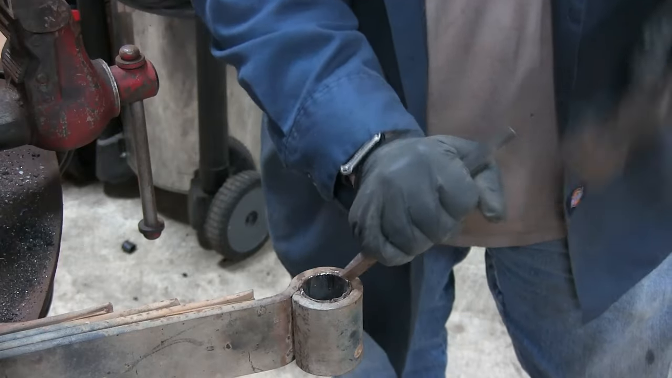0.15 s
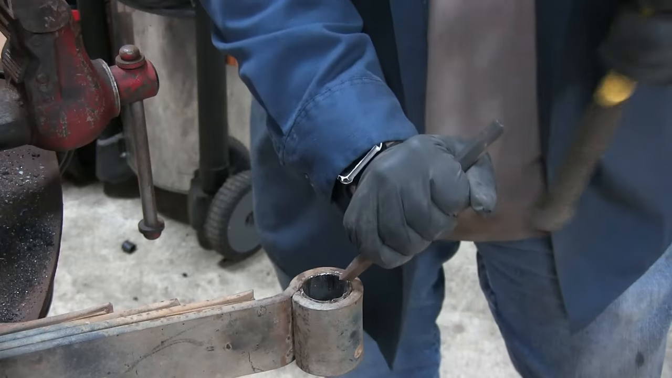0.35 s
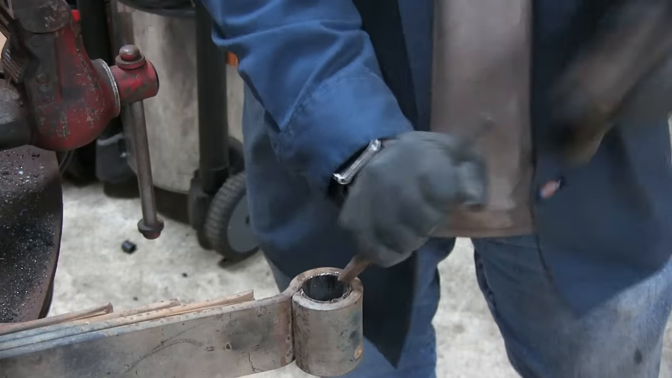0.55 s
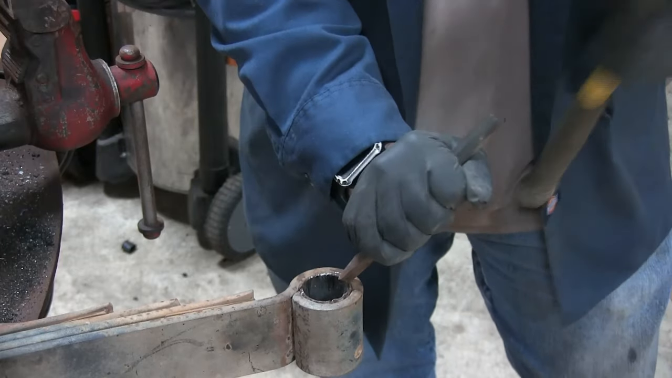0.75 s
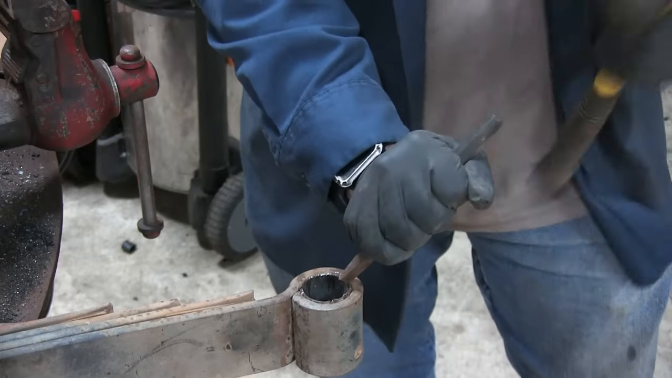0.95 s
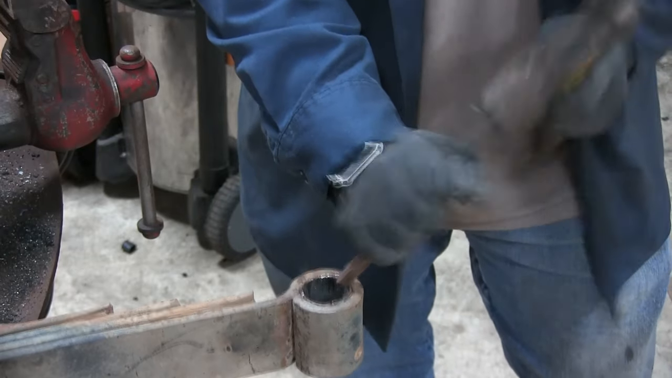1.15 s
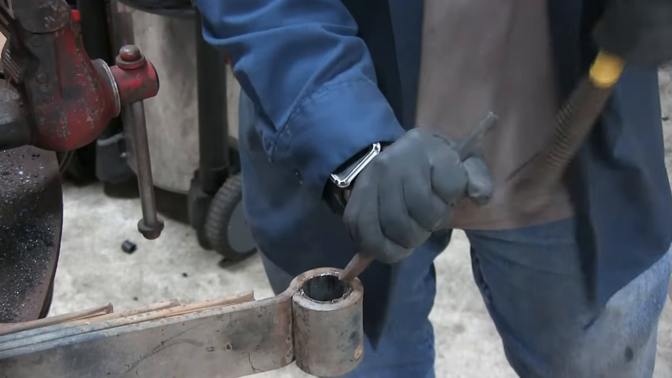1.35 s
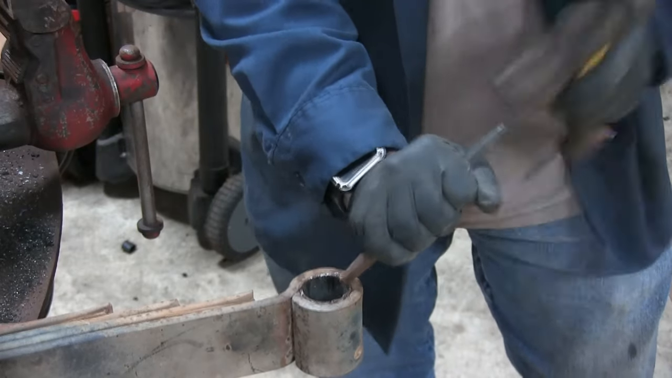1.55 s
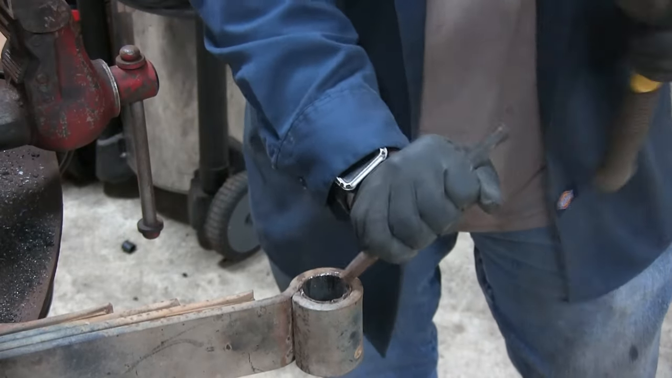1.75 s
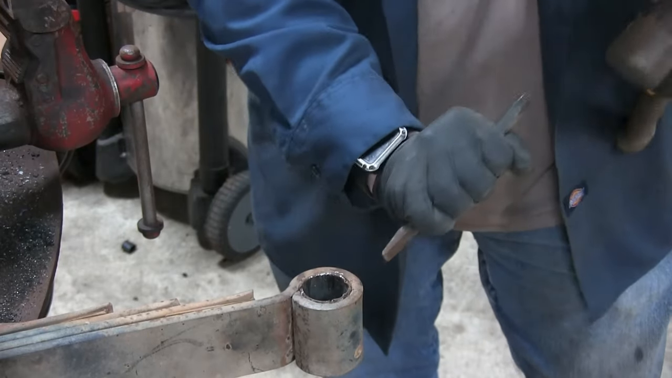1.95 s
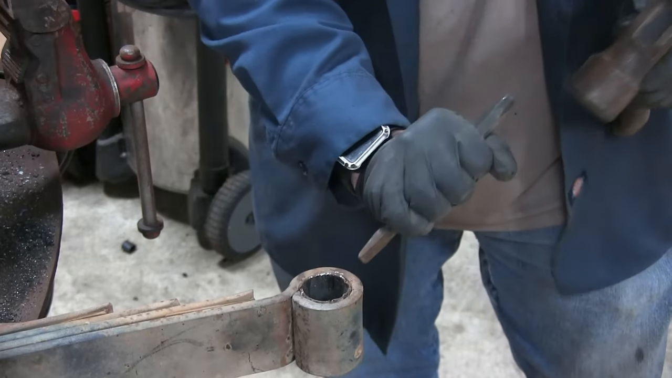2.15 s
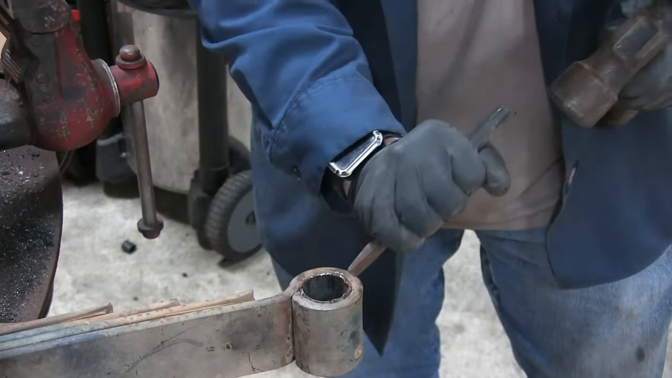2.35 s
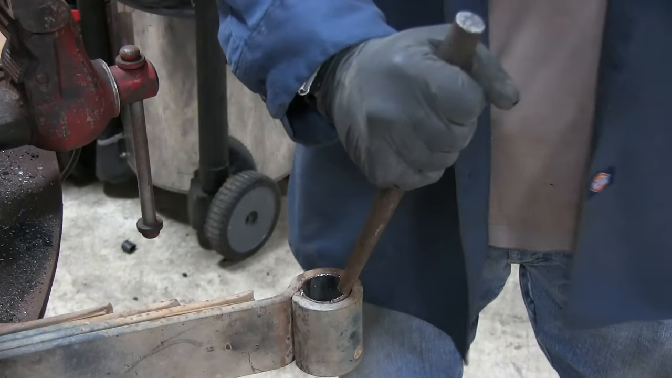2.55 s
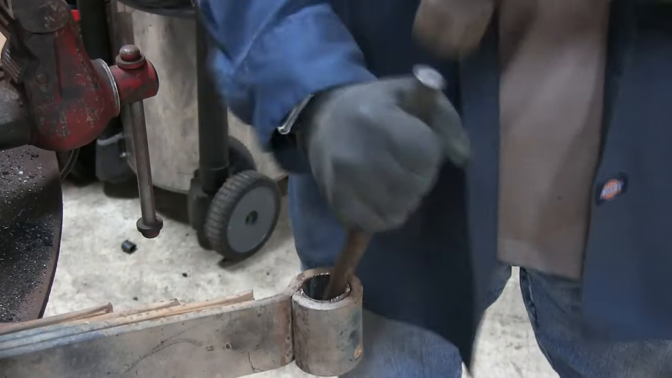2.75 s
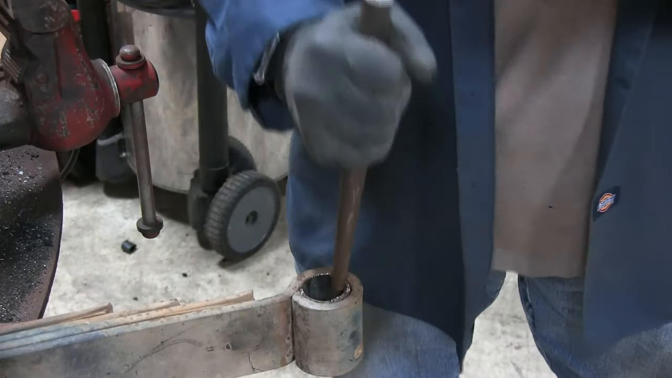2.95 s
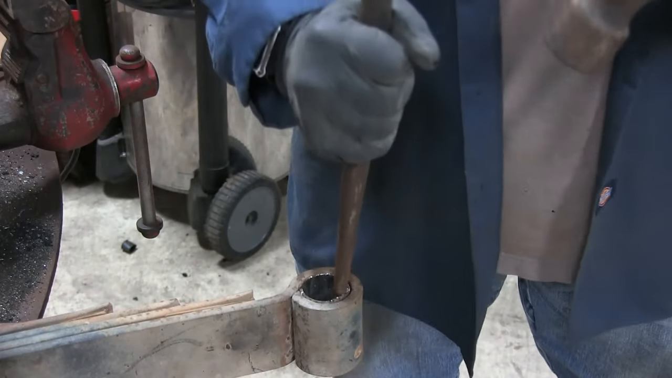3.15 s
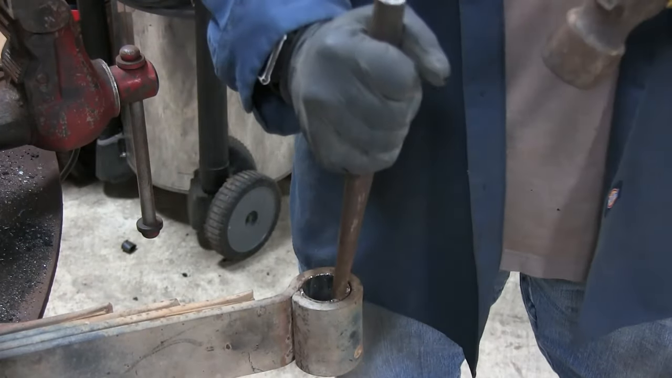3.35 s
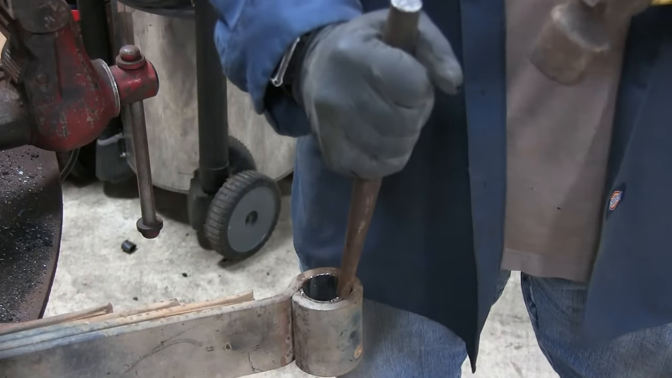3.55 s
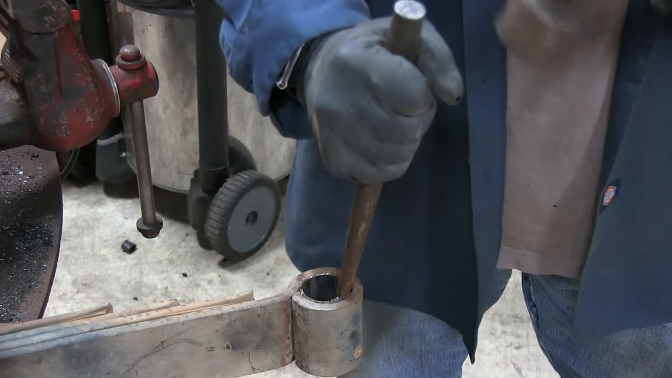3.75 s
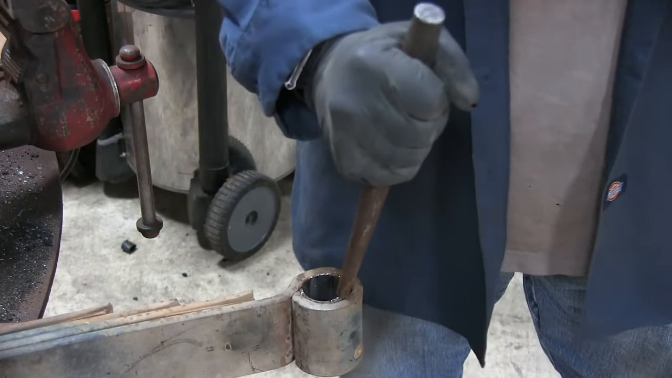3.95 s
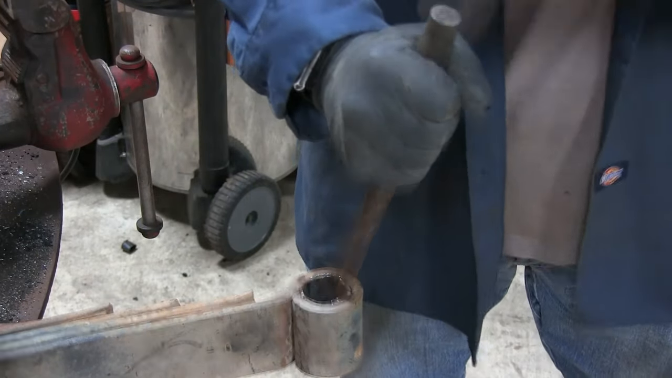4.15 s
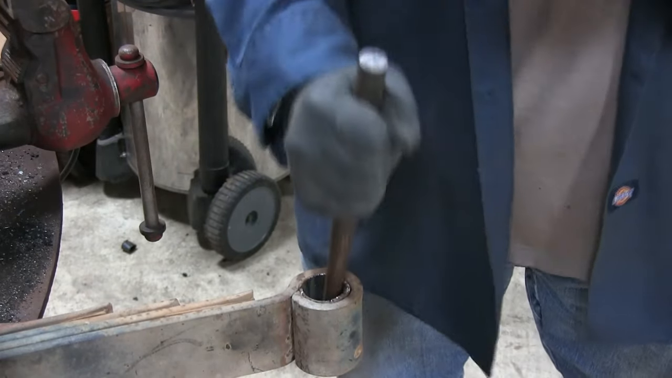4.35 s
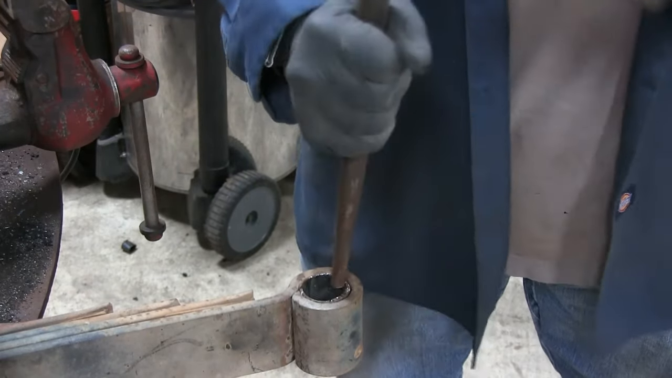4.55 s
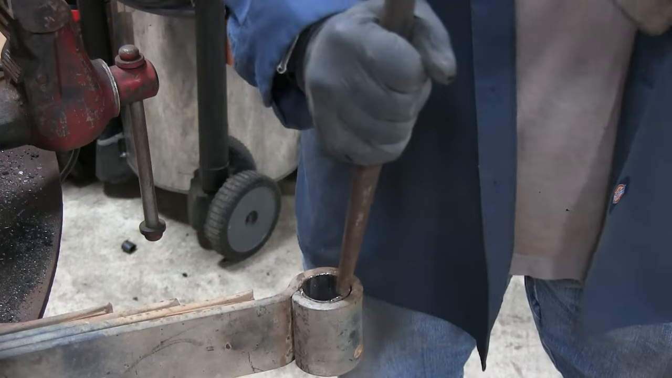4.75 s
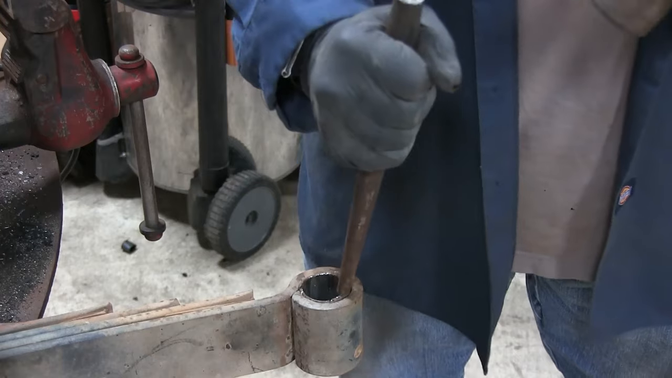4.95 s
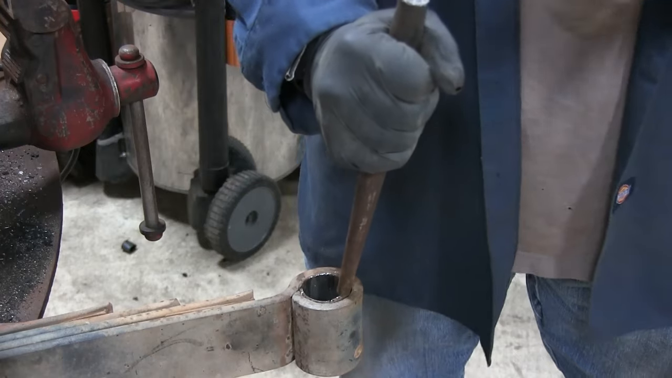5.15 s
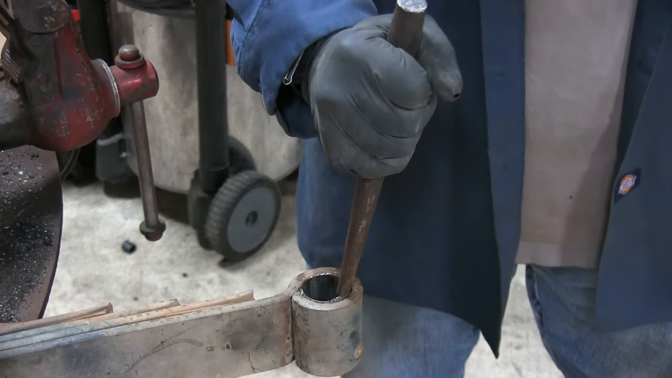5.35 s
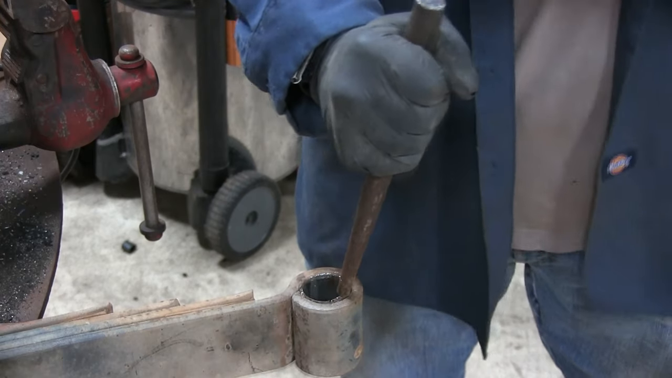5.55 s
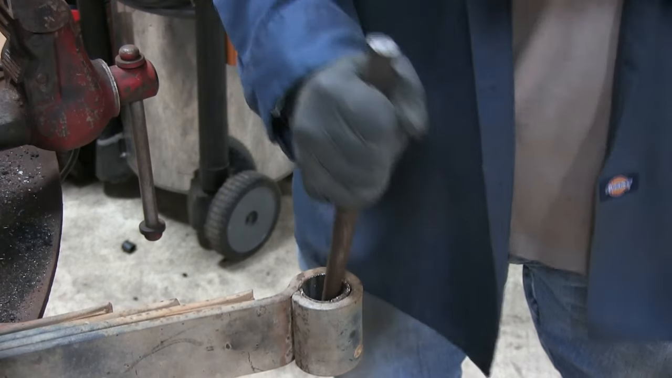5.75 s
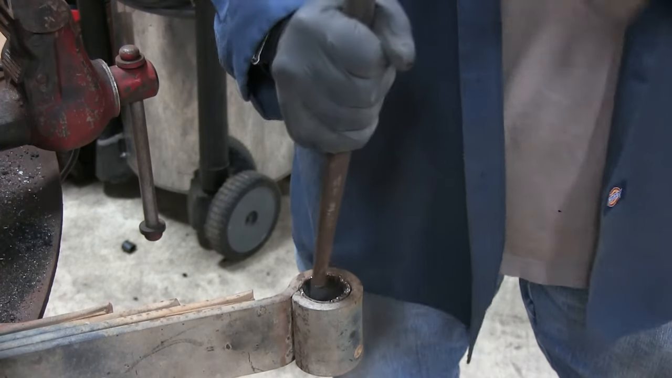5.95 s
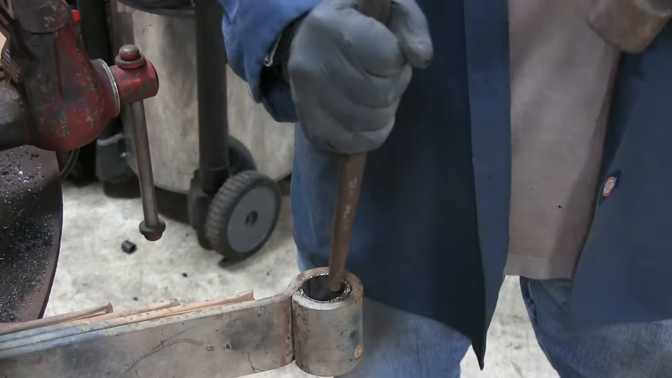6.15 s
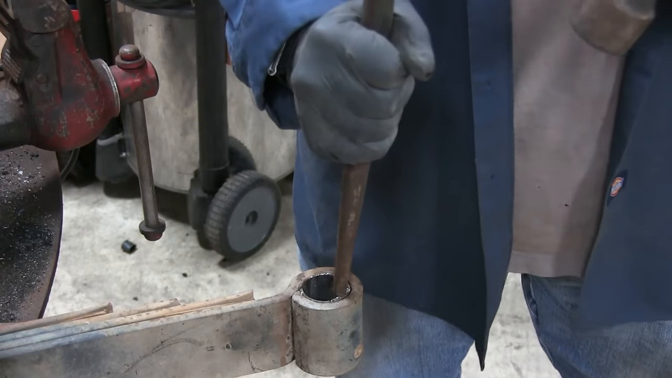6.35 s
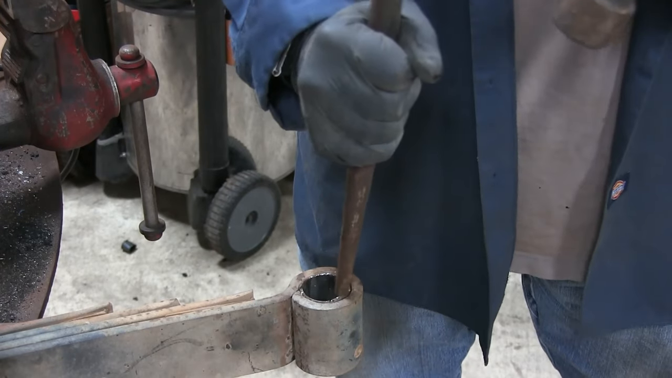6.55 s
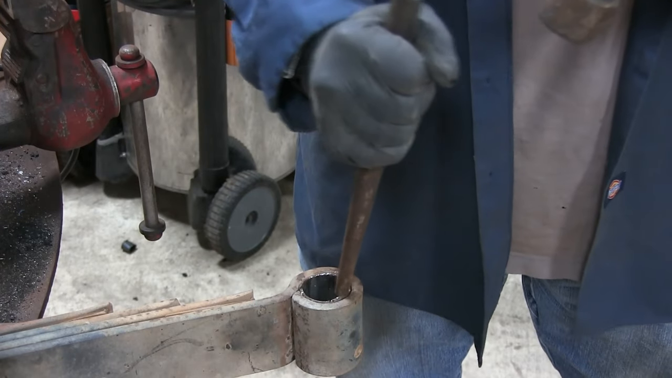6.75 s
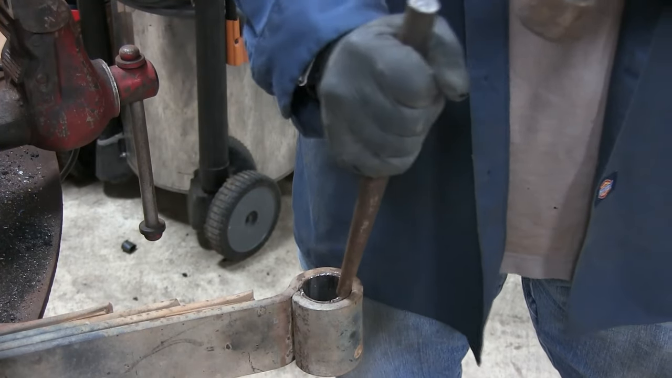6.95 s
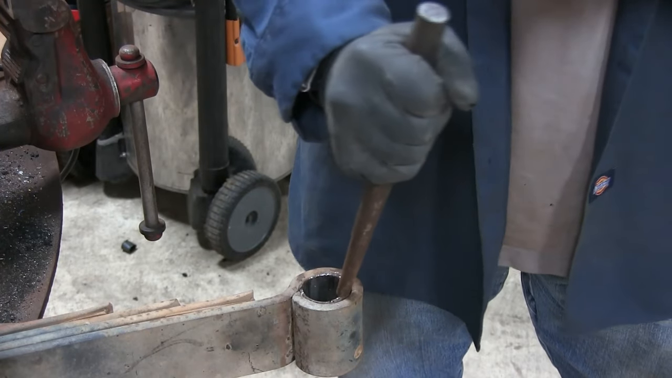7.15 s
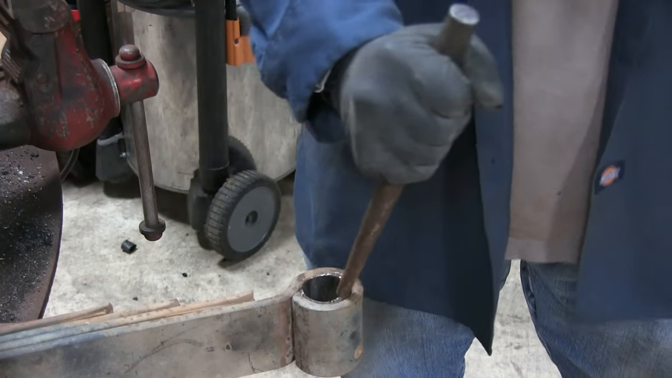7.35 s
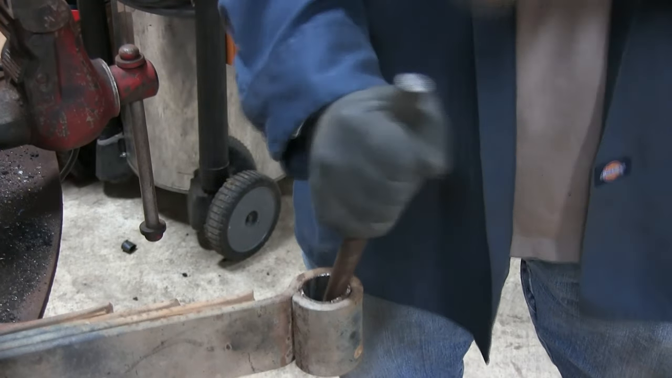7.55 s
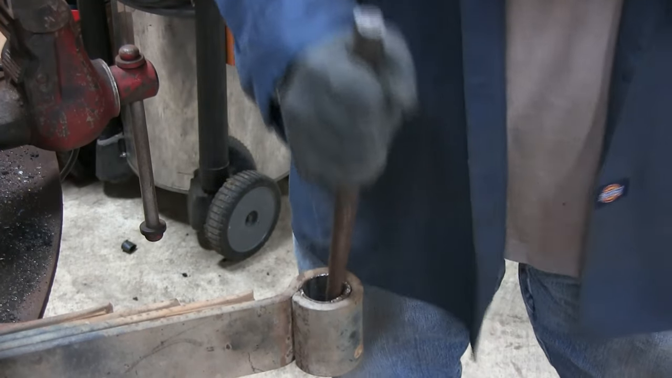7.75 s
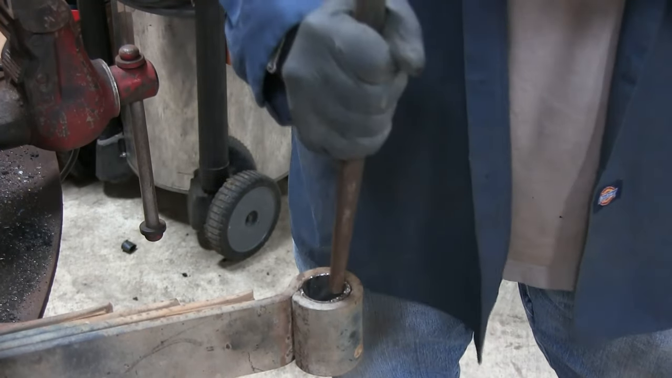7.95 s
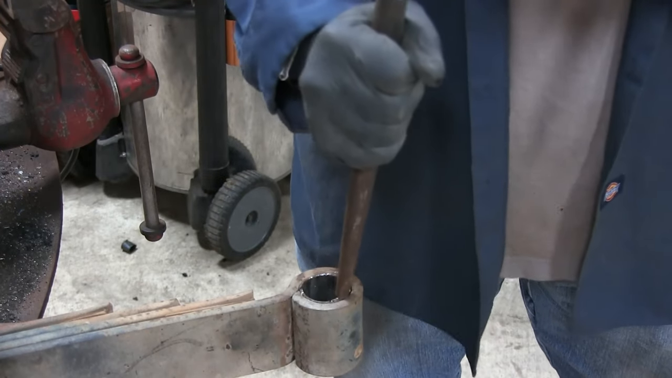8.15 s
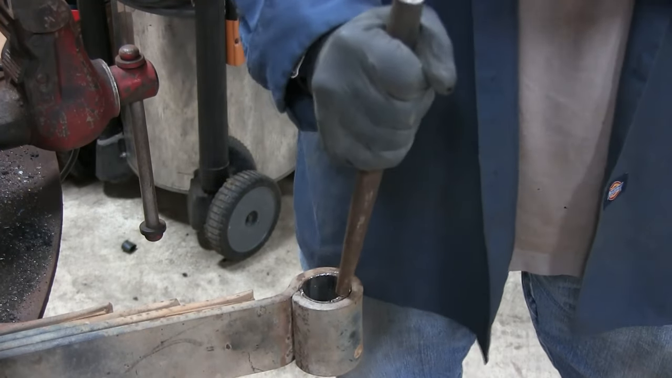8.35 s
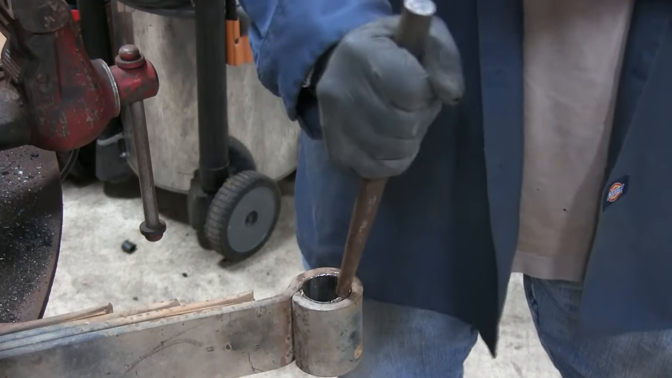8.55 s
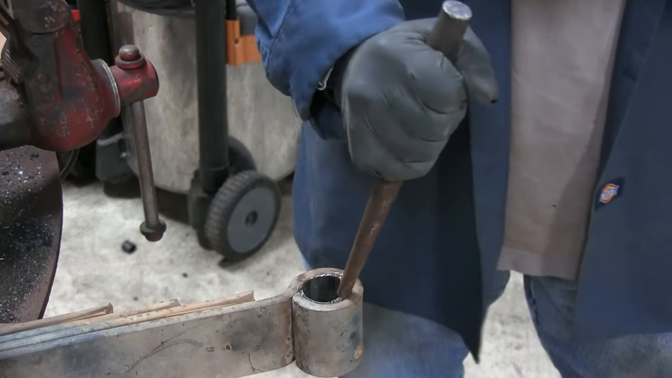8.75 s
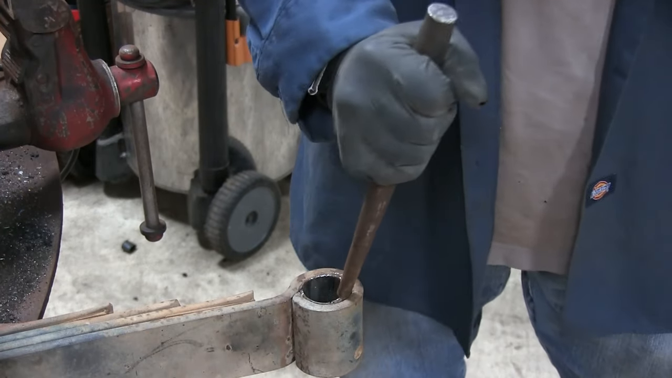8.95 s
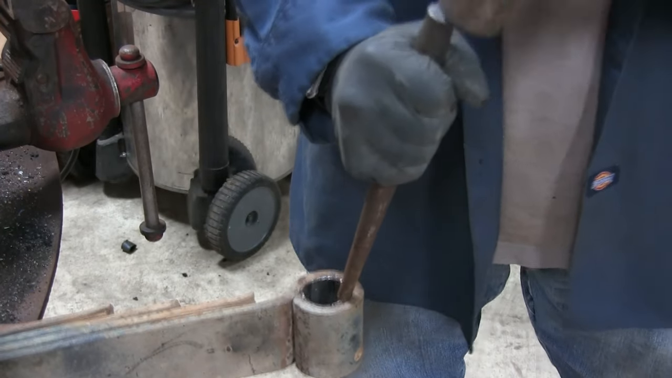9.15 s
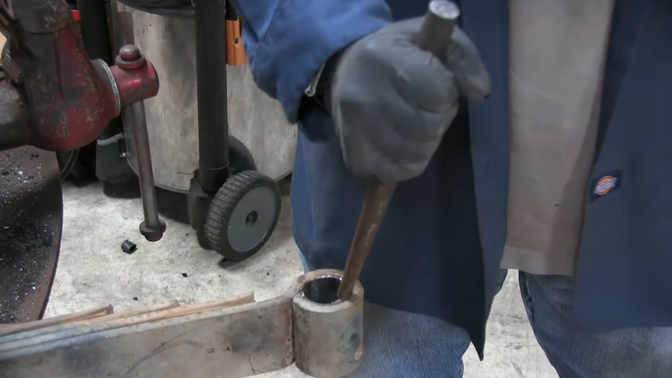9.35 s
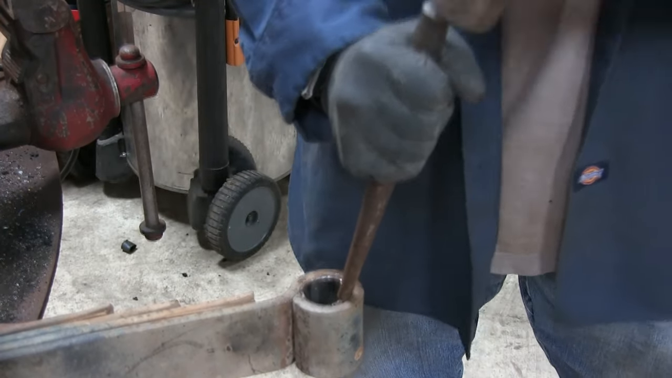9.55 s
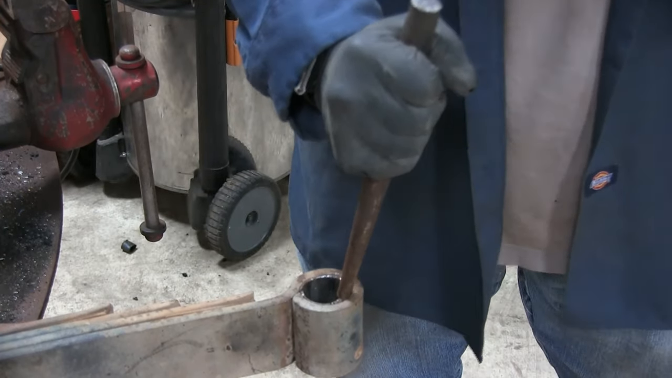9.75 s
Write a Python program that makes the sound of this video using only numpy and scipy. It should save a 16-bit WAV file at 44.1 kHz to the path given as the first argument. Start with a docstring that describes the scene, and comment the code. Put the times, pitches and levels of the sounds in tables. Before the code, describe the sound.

A hammer hits a steel punch against a metal sleeve four times in quick succession, then six more times, mostly at a slower pace. Each blow is a sharp crack with a high ring and about a second of workshop echo. After the later blows the clamped steel part rattles faintly in the vise, and the punch clinks softly on the rim. The sound is close, over very low room tone.

```python
"""A hammer drives a steel punch against a sleeve in a steel arm, held in a vise in a hard-walled shop.
Each impact radiates a crack and excites the modes of the steel, and the room reverberates.
After the later blows the arm swings and chatters in the jaws; between blows the punch clinks on the rim.
A low rush of room tone lies beneath. A limiter ducks at each crack and recovers about as fast as the
reverberation decays, so the echo hangs before it falls."""
import sys
import numpy as np
from scipy import signal
from scipy.fft import rfft, irfft
from scipy.io import wavfile
from scipy.ndimage import uniform_filter1d, map_coordinates

SR = 44100
rng = np.random.default_rng(int(sys.argv[2]) if len(sys.argv) > 2 else 0)


def bounce(signal):
    """Save signal as a 16-bit WAV file at the path given by the first command-line argument."""
    frames = np.transpose(np.atleast_2d(signal))
    limited = np.clip(frames, -1, 1)
    pcm = np.round(limited * 32767).astype(np.int16)
    wavfile.write(sys.argv[1], SR, pcm)


N = 436590
T = np.arange(3 * SR // 2) / SR  # time axis of one decay, in seconds

# Hammer blows. Each row: start in seconds, force in dB, brightness in dB per octave,
# grip on the punch from 0 to 1, relative ring of the sleeve in dB.
HAMMER_BLOWS = [(0.524, -15.5, 0.5, 0.8, -30), (0.8912, -10, 0.5, 0.32, -30.5),
                (1.2272, -7, 0.8, 0.13, -21.5), (1.577, -8.5, 1.35, 0.01, -24.5),
                (2.7089, -7.5, 0, 0.41, -18), (4.2378, -4.5, -.5, .75, -23.5),
                (5.6498, -3.5, -0.15, .35, -32), (7.54, -6, 0, 0.24, -30), (9.2241, -9.5, .1, 0.57, -36),
                (9.6172, -.5, -0.1, 0.2, -25)]
# Punch on the rim. Each row: start in seconds, relative level in dB, relative brightness in dB per octave.
RIM_KNOCKS = [(3.403, -47.5, -12), (3.583, -53.5, -9), (4.548, -37.5, -4), (4.944, -40, -3),
              (6.158, -46.5, -5.5), (6.204, -42, -7.5), (6.602, -43.5, -3), (6.923, -45, -2.4),
              (7.22, -54.5, -5.5), (7.33, -58, -4.5), (8.105, -40, -3), (8.376, -39, -2.5),
              (8.426, -35, -1.5), (8.674, -48, -4.5)]
# Free modes of punch and sleeve. Each row: frequency in Hz, t60 (60 dB decay) in seconds, delay in seconds.
FREE_MODES = [(5101, .85, .033), (6304, 1.05, .004), (8197, .72, .058), (11803, .62, .015)]
# The punch's low, middle and top mode. Each row: relative level in dB when held loosely,
# change in dB under a tight grip, change in dB by the last blow.
PUNCH_LEVELS = [(-7, -19.5, 1.5), (-5.5, -29.5, -2), (-17, -15.5, -16)]
# Modes of steel parts in contact. Each row: frequency in Hz, relative level in dB, t60 in seconds.
CONTACT_MODES = [(1400, -17, 0.089), (1766, -20.5, 0.15), (2300, -22, 0.12), (3286, -2.5, 0.017),
                 (3640, -12, 0.014), (4250, -35.5, 0.026), (5300, -12, 0.02), (6570, -20.5, 0.022),
                 (7540, -2, 0.0093), (10060, -11.5, 0.022), (11000, -17, .015)]
# Modes of the lightly touched sleeve. Each row: frequency in Hz, relative level in dB, t60 in seconds.
CLINK_MODES = [(370, -4, 0.93), (504, -2.5, .7), (900, -2, 0.45), (1170, -2.5, 0.65), (1318, -0.5, 0.7),
               (1990, -11, 0.74), (2520, -7.5, 0.65), (2950, -10.5, 0.77), (5170, -16, 0.47)]
# Resonances of arm and vise. Each row: frequency in Hz, bandwidth in Hz, relative height in dB.
ARM_RESONANCES = [(82.6, 9.2, 11), (213, 14, 5), (380, 14, 1), (567, 16, 6.5), (740, 8.5, -0.5),
                  (938, 16, 3.5), (1322, 56, 5), (1578, 94, 5), (1670, 170, -2), (1776, 54, 4),
                  (2000, 23, 4), (2208, 17, 2), (2404, 60, 5), (2806, 11, -0.5), (3185, 28, -3),
                  (3443, 45, 4.5), (3650, 56, -1), (4140, 22, -2.5), (7380, 280, 6.5), (9970, 140, 8.5),
                  (14100, 400, 3.5), (15400, 240, 4.5)]
# Resonances of sleeve and loose punch. Each row: frequency in Hz, bandwidth in Hz, relative height in dB.
SLEEVE_RESONANCES = [(386.5, 30, 4), (495, 76, 4.5), (722, 17, 3), (845, 32, 7), (1108, 18, 6.5),
                     (1217, 17, 6.5), (2044, 50, 2.5), (2470, 99, -1.5), (3100, 57, -4.5), (3470, 53, -6.5),
                     (4950, 60, -1), (5020, 57, 1.5), (6440, 83, -6), (8300, 150, 5), (10000, 200, 2)]
# Hollow note and clang, set by where the punch sits. Each row: frequency in Hz, bandwidth in Hz.
SEAT_RESONANCES = [(395, 52), (1760, 160)]
# Spectra of crack, echo and room tone. Each row: frequency in Hz, relative spectral density in dB.
CRACK_SPECTRUM = [(40, -15), (300, -7), (800, 4), (1500, 19.5), (4000, 12.5), (7500, 11.5), (9000, -2),
                  (12000, -2), (16000, -3.5)]
ECHO_SPECTRUM = [(30, -50.5), (55, -21.5), (90, -18.5), (140, -5.5), (220, -2.5), (450, -1), (950, -1),
                 (1700, 0.5), (2700, -3), (3900, -3), (4700, -8), (5500, -5.5), (6800, -11.5),
                 (9000, -15.5), (15500, -29.5)]
ROOM_TONE_SPECTRUM = [(25, -33.5), (50, -13), (85, -2.5), (260, -0.5), (420, -6.5), (800, -10.5),
                      (1100, -14), (1500, -16.5), (3500, -22), (6000, -25.5), (14000, -34.5), (16000, -39)]
# Reverberation time of the workshop. Each row: frequency in Hz, t60 in seconds.
ROOM_T60 = [(80, 0.87), (260, 1.127), (700, 1.09), (1800, 1), (4500, 0.89), (8000, 0.66), (14000, 0.4)]
# Coherence of the room's sound field. Each row: frequency in Hz, left-right correlation.
COHERENCE = [(60, 0.6), (130, 0.96), (290, 0.92), (640, .72), (1410, 0.62), (3100, .54), (7000, .58),
             (15000, 1)]
# Brief rises of the background level. Each row: start in seconds, end in seconds, rise in dB.
ROOM_SWELLS = [(0, 0.512, 4.5), (2.492, 2.71, 2.5)]

HOLLOW_DB, CLANG_DB = (9.5, -9.5), (-2, 8)  # relative heights at the first and the last blow
UPRIGHT_S = 2.4  # from here on the punch stands upright, so each blow sets the arm swinging


def hammer(fine, room_db=-14, ring_db=-12, thud_db=-21, bounce_db=-20, bounce_s=.021):
    """Impact excitation: each blow sounds steel, vise and room; the grip damps the punch's modes."""
    out = np.zeros((2, N))
    # the echo builds quickly, then thins between the near floor and the far walls
    gap_db = -3 * np.exp(-((T - .039) / .01) ** 2)
    build = (1 - np.exp(-T / .004)) * amp(gap_db)
    depths = np.linspace(0, 1, len(HAMMER_BLOWS))
    for (s, db, bright_db, grip, sleeve_db), depth in zip(HAMMER_BLOWS, depths):
        # each blow drives the sleeve deeper: the hollow note fades and the clang grows
        seat = [(hz, width, first + depth * (last - first))
                for (hz, width), (first, last) in zip(SEAT_RESONANCES, (HOLLOW_DB, CLANG_DB))]
        low_db, middle_db, top_db = (loose + grip * gripped + depth * deep
                                     for loose, gripped, deep in PUNCH_LEVELS)
        crack = amp(db) * contact(bright_db)
        add(out, s, crack)
        add(out, s + bounce_s, amp(bounce_db) * crack)  # floor reflection
        add(out, s, amp(db + thud_db) * vise_thud())
        add(out, s, amp(db + ring_db) * steel_ring([low_db, sleeve_db, middle_db, top_db]))
        add(out, s, amp(db + room_db) * build * echo(ARM_RESONANCES + seat, fine, bright_db, peaks_db=-1))
    return out


def contact(bright_db, crack_db=-2, crack_t60=.032, scatter_db=6.5, detune=.023):
    """Contact damping: steel on steel gives a broadband crack and choked modes; peak short-term power 1."""
    t = T[:SR // 5]
    crack = noise(lambda f: amp(along(CRACK_SPECTRUM, f)) * tilt(f, bright_db), len(t), width=.39)
    crack *= amp(crack_db - 60 * t / crack_t60)
    clank = np.zeros_like(crack)
    for hz, db, t60 in CONTACT_MODES:
        level, pitch, phase, spread = rng.standard_normal(4)
        envelope = amp(db + scatter_db * level - 60 * t / t60) * tilt(hz, bright_db)
        stereo_phase = np.pi * phase + .41 * spread * np.array([[1], [-1]])
        clank += envelope * np.sin(2 * np.pi * hz * (1 + detune * pitch) * t + stereo_phase)
    return (crack + clank) / np.sqrt(short_power(crack + clank).max())


def steel_ring(levels_db, swell_s=.006):
    """Free vibration: the steel rings only once the punch has rebounded from the sleeve."""
    return sum(amp(db) * (1 - np.exp(-np.maximum(T - delay, 0) / swell_s)) * damped_mode(hz, t60)
               for (hz, t60, delay), db in zip(FREE_MODES, levels_db))


def vise_thud(centre_hz=450, octaves=.8, peak_s=.019, width_s=.0057):
    """Inertia: the heavy vise takes up the blow a moment later, in a pulse of low noise."""
    t = T[:SR // 10]
    band = noise(lambda f: np.exp(-(np.log2((f + 1) / centre_hz) / octaves) ** 2), len(t))
    return band * np.exp(-((t - peak_s) / width_s) ** 2)


def rim_knocks(fine, click_db=-2, ring_db=-9.5, dull_db=-2.5, scatter_db=3, opening_db=-63, lead_db=4):
    """Light impact: the punch, set back on the rim, clicks softly and excites the sleeve's modes."""
    out = np.zeros((2, N))
    envelope = knock_envelope(room_db=-12, near_t60=.092, rise_s=.0015)
    touch = 1 - np.exp(-(T / .00024) ** 2)
    modes = np.array([amp(db) * touch * damped_mode(hz, t60) for hz, db, t60 in CLINK_MODES])
    # at the start the sleeve is still ringing faintly, led by its strongest mode
    strongest = modes[np.argmax([db for _, db, _ in CLINK_MODES])]
    add(out, 0, amp(opening_db) * (modes.sum(axis=0) + amp(lead_db) * strongest))
    for s, db, bright_db in RIM_KNOCKS:
        click = contact(2 * bright_db)
        add(out, s, amp(db + click_db + 2 * bright_db) * click * touch[:click.shape[1]])
        add(out, s, amp(db) * envelope * echo(SLEEVE_RESONANCES, fine, bright_db + dull_db, peaks_db=4))
        # a bright knock is a clean rebound that leaves the sleeve free to ring louder
        modes_db = db + ring_db + 2.9 * bright_db + rng.normal(0, scatter_db, len(modes))
        add(out, s, np.tensordot(amp(modes_db), modes, 1))
    return out


def arm_shudder(fine, wait_s=.39, length_s=.62, period_s=.048, first_db=-37, fall_db_per_s=40.5):
    """Damped oscillation: after an upright blow the arm chatters in the jaws, in proportion to the force."""
    out = np.zeros((2, N))
    envelope = knock_envelope(room_db=-14, near_t60=.038, rise_s=.0036)
    for s, force_db, *_ in HAMMER_BLOWS:
        if s > UPRIGHT_S:
            start = s + wait_s
            for age in np.arange(0, min(length_s, N / SR - start), period_s):
                db = force_db + first_db - fall_db_per_s * age + rng.normal(0, 2.3)
                onset = start + age + rng.normal(0, .006)
                knock = envelope * echo(SLEEVE_RESONANCES, fine, bright_db=-5, peaks_db=1)
                add(out, onset, amp(db) * knock)
    return out


def knock_envelope(room_db, near_t60, rise_s, near_db=-3):
    """Direct and reverberant sound: the near part dies quickly and leaves the room's share."""
    return (amp(room_db) + amp(near_db - 60 * T / near_t60)) * (1 - np.exp(-T / rise_s))


def damped_mode(hz, t60, direct_fall_db_per_s=20 / .33, reflected=.55, flutter_rate=70):
    """Interference: a decaying pure tone flutters as its own reflections add in random phase."""
    shared, left, right = (wobble(flutter_rate) + 1j * wobble(flutter_rate) for _ in range(3))
    reflections = reflected * (shared + np.array([left, right])) / np.sqrt(2)
    paths = amp(-direct_fall_db_per_s * T) + reflections
    return amp(-60 * T / t60) * np.real(paths * np.exp(2j * np.pi * hz * T))


def fine_modes(spacing_hz=16, depth_db=2):
    """Modal overlap: crowded small modes of vise and bench give a fixed ripple of gain over frequency."""
    hz = np.fft.rfftfreq(len(T), 1 / SR)
    return amp(depth_db * map_coordinates(rng.standard_normal(len(hz)), [hz / spacing_hz]))


def echo(resonances, fine, bright_db, peaks_db):
    """Reverberation: noise coloured by the steel's resonances decays in the room, the treble first."""
    def colour(f):
        peaks = sum(amp(db + peaks_db) ** 2 / (1 + (2 * (f - hz) / width) ** 2)
                    for hz, width, db in resonances)
        return amp(along(ECHO_SPECTRUM, f)) * fine * np.sqrt(1 + peaks) * tilt(f, bright_db)
    hz, t, bands = signal.stft(noise(colour, len(T)), SR, nperseg=512)
    decay = amp(-60 * t / along(ROOM_T60, hz)[:, None])
    return signal.istft(bands * decay, SR, nperseg=512)[1][:, :len(T)]


def room_tone(level_db=-70.5):
    """Ambient noise: the workshop's steady low rush; the background level rises briefly twice."""
    t = np.arange(N) / SR
    steps_db = sum(db * ((t >= start) & (t < end)) for start, end, db in ROOM_SWELLS)
    swell_db = uniform_filter1d(steps_db, SR // 50)
    return amp(level_db + swell_db) * noise(lambda f: amp(along(ROOM_TONE_SPECTRUM, f)), N)


def noise(colour, size, width=1):
    """Partial coherence: stereo noise of rms 1, shaped by colour(Hz); the upper bass is nearly mono."""
    hz = np.fft.rfftfreq(size, 1 / SR)
    angle = width * np.arccos(np.clip(along(COHERENCE, hz), -1, 1)) / 2
    spectra = rfft(rng.standard_normal((2, size))) * colour(hz)
    mid, side = irfft(spectra * [np.cos(angle), np.sin(angle)], size)
    stereo = np.array([mid + side, mid - side])
    return stereo / np.sqrt(np.mean(stereo ** 2) + 1e-20)


def wobble(rate):
    """Band-limited modulation: a smooth random curve with rate knots a second."""
    return signal.resample(rng.standard_normal(int(rate * T[-1])), len(T))


def tilt(hz, slope_db):
    """Spectral tilt: a gain sloping by slope_db an octave above the bass."""
    return amp(slope_db * np.log2(np.clip(hz, 700, None) / 1500))


def short_power(x):
    """Short-term power: the mean square of both channels over 2.5 ms."""
    return np.abs(uniform_filter1d(np.mean(x ** 2, axis=0), SR // 400, mode="constant"))


def amp(db):
    """Amplitude ratio of a level in decibels."""
    return 10 ** (np.asarray(db) / 20)


def along(points, hz):
    """Interpolation of (Hz, value) points on a logarithmic frequency axis."""
    freqs, values = np.transpose(points)
    return np.interp(np.log(hz + 1), np.log(freqs + 1), values)


def add(track, s, sound):
    """Superposition: a sound joins the track at s seconds."""
    part = track[:, max(round(s * SR), 0):][:, :sound.shape[-1]]
    part += sound[..., :part.shape[1]]


def scene(left_db=.58):
    """Superposition of all sources; a level difference places them slightly to the left."""
    fine = fine_modes()
    mix = hammer(fine) + rim_knocks(fine) + arm_shudder(fine) + room_tone()
    return mix * amp([[left_db], [-left_db]])


def record(dry, limit_db=-22.5, release_db_per_s=64, ceiling_db=-22.5, low_cut_hz=45, top_hz=15500):
    """Dynamic range compression: low cut, a limiter that ducks at once, soft clipping, band limit."""
    dry = signal.sosfilt(signal.butter(2, low_cut_hz, "high", fs=SR, output="sos"), dry)
    over_db = np.maximum(10 * np.log10(short_power(dry) + 1e-12) - limit_db, 0)
    recovery_db = release_db_per_s * np.arange(N) / SR
    limited = dry * amp(recovery_db - np.maximum.accumulate(over_db + recovery_db))
    clipped = limited / (1 + (limited / amp(ceiling_db)) ** 4) ** (1 / 4)
    return signal.sosfilt(signal.butter(24, top_hz, fs=SR, output="sos"), clipped)


dry = scene()
out = record(dry)
bounce(out)
```